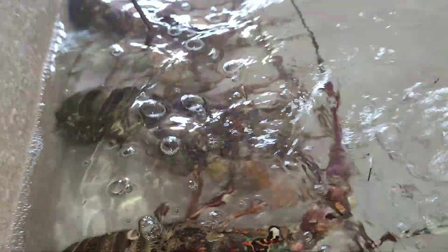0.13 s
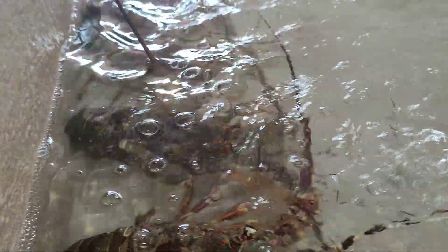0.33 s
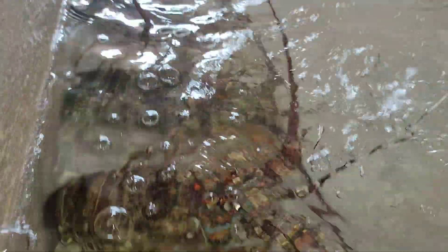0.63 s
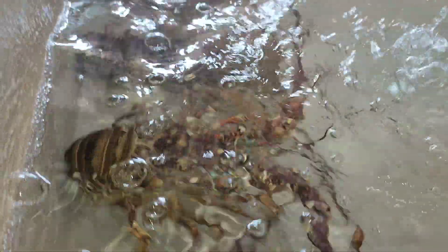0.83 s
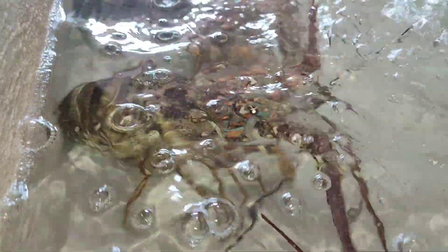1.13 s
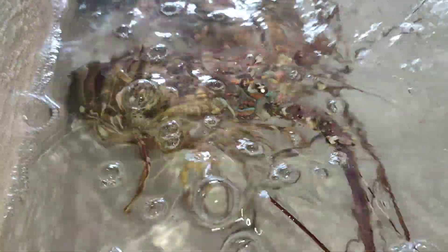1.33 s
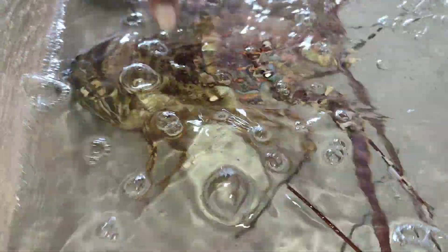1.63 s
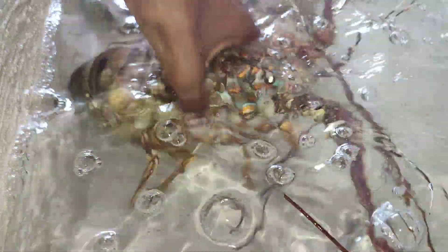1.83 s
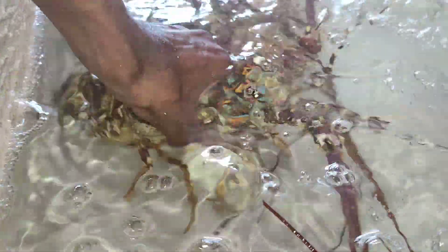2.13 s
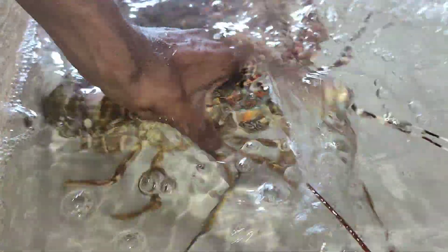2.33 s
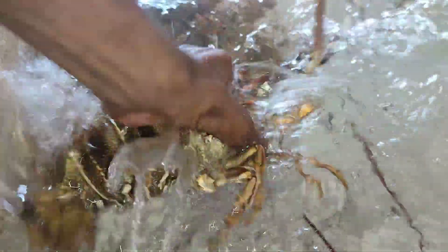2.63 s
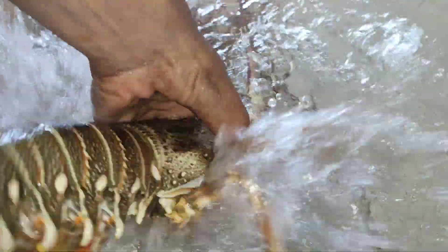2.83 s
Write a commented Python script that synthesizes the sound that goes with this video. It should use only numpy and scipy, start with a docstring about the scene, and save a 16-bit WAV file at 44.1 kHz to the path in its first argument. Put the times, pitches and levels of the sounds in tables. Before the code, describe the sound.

Water bubbles steadily in a tank from start to finish: low, rounded, overlapping glugs rising slightly in pitch, over a quiet pump hum, faint wavering whines and soft surface fizz. Small bubbles pop from about 0.3 to 2.4 s. At 2.56 s a lobster's shell snaps sharply; tail flaps throw bright splashes around 2.7, 2.84 and 2.97 s, with clicks and hollow plops. Close, slight tank reflection.

```python
"""Lobster lifted from a bubbling tank

Air glugs steadily into the water, each bubble a ringing tone whose pitch creeps up.
Behind it are a pump's hum, thin wavering tones and the fizz of the surface, made of coloured noise.
Near the end the shell clicks in short noisy rings and the tail flaps three times.
The flaps throw spray, made of random droplets and tiny bubbles, and air pockets plop."""
import sys
import numpy as np
from scipy import signal
from scipy.fft import rfft, irfft
from scipy.io import wavfile
from scipy.ndimage import uniform_filter1d

SR = 44100
rng = np.random.default_rng(int(sys.argv[2]) if len(sys.argv) > 2 else 0)


def digitize_waveform(pressure):
    """Quantize a signal to 16-bit integers and store it at the path in sys.argv[1].

    Rows of a 2-D input are taken as channels; values are limited to [-1, 1].
    """
    field = np.atleast_2d(pressure).T
    bounded = np.clip(field, -1, 1)
    quanta = np.round(bounded * 32767).astype(np.int16)
    wavfile.write(sys.argv[1], SR, quanta)


N = 132300  # samples: three seconds
T = np.arange(N) / SR  # time in seconds
HZ = np.fft.rfftfreq(N, 1 / SR)  # frequencies of a full-length spectrum
BUBBLE_GLIDE_PER_S = 1.94  # pitch rise of a bubble, as a share of its pitch per second


def amp(db):
    """Turns decibels into gain."""
    return 10 ** (np.asarray(db) / 20)


def unit(x):
    """Scales a sound to an rms of 1."""
    return x / np.sqrt(np.mean(x ** 2) + 1e-20)


def read(points, hz):
    """Reads a curve of (Hz, value) points on a log-frequency axis."""
    point_hz, value = np.transpose(points)
    return np.interp(np.log(hz + 1), np.log(point_hz + 1), value)


def level(points):
    """Gain over time from (s, dB) points."""
    return amp(np.interp(T, *np.transpose(points)))


def pan(side_db):
    """Left and right gains of mean power 1; side_db is left minus right."""
    side_db = np.atleast_1d(side_db)
    gains = amp(np.array([side_db, -side_db]) / 2)
    return gains / np.sqrt((gains ** 2).mean(0))


def add(mix, start_s, sound):
    """Mixes a sound in at a start time, cut off at the end of the mix."""
    start = max(round(start_s * SR), 0)
    part = mix[:, start:][:, :sound.shape[-1]]
    part += sound[..., :part.shape[1]]


def drift(seconds):
    """Smooth random wander of rms 1; more seconds make it slower."""
    smooth = np.exp(-(HZ * seconds) ** 2)
    return unit(irfft(rfft(rng.standard_normal(N)) * smooth, N))


def hump(hz, centre_hz, width):
    """Bell curve on a log-frequency axis."""
    return np.exp(-.5 * (np.log((hz + 1) / centre_hz) / width) ** 2)


def decay(t, t60):
    """Exponential fade that loses 60 dB in t60 seconds."""
    return np.exp(-np.log(1000) * t / t60)


def bubble(hz, t60, rise_s, glide):
    """A ringing air bubble whose pitch creeps up by glide per second; envelope peak 1."""
    t = np.arange(SR // 5) / SR
    shape = (1 - np.exp(-t / rise_s)) * decay(t, t60)
    turns = hz * (t + glide * t ** 2 / 2)
    return shape / shape.max() * np.sin(2 * np.pi * turns)


def bloop(length_s, first_hz, last_hz):
    """A bubble that swells and fades while its pitch sweeps up; envelope peak 1."""
    n = round(length_s * SR)
    turns = np.cumsum(np.geomspace(first_hz, last_hz, n)) / SR
    return np.hanning(n) * np.sin(2 * np.pi * turns)


def crowd(per_s, hz, spread, t60, side_db, uneven_db=0, count=32):
    """Random bubbles in count sizes, weaker away from the middle pitch; side_db scatters them in stereo."""
    out = np.zeros((2, N))
    strength = amp(uneven_db * rng.uniform(-1, 1, N))
    for place in np.linspace(-2, 2, count):
        starts = rng.random(N) < per_s / count / SR
        hits = starts * strength * np.exp(-place ** 2 / 4)
        ring = bubble(hz * np.exp(spread * place), t60, t60 / 20, BUBBLE_GLIDE_PER_S)
        out += pan(side_db * rng.normal()) * signal.oaconvolve(hits, ring)[:N]
    return unit(out)


def whistle(hz, waver_hz):
    """A thin tone that wavers in pitch and flutters in strength, rms 1."""
    flutter_db = 1.3
    start_turn = rng.random((2, 1)) / 4  # left and right start at slightly different phases
    turns = np.cumsum(hz + waver_hz * drift(seconds=0.0076)) / SR + start_turn
    return unit(np.sin(2 * np.pi * turns) * amp(flutter_db * drift(seconds=0.025)))


def spray_colour(hz):
    """Gain of splashing water at each frequency, with the bass rolled off."""
    # relative strength of the spray: pitch_hz, level_db (per Hz, before the bass cut)
    colour = [(240, -45), (400, -4), (725, -8), (939, -29), (1110, -10), (1220, -16), (1730, -8),
              (2530, -5), (3180, -4.5), (4320, -2.5), (4660, -6), (7030, -3), (9250, -16), (12900, -11),
              (15300, -20)]
    bass_cut_hz = 480
    return amp(read(colour, hz)) / np.sqrt(1 + (bass_cut_hz / (hz + 1)) ** 4)


def click(hz, t60, broad_db):
    """A sharp wet tick: noise ringing around one pitch plus a broad crack, fading fast."""
    width, rise_s = 0.071, 0.00052
    t = np.arange(4096) / SR
    f = np.fft.rfftfreq(len(t), 1 / SR)
    colour = hump(f, hz, width) + amp(broad_db) * spray_colour(f)
    ring = unit(irfft(rfft(rng.standard_normal((2, len(t)))) * colour))
    return 0.85 * ring * np.minimum(t / rise_s, 1) * decay(t, t60)


def pump_hum():
    """The pump's hum: steady sine waves, the same on both sides."""
    # hum tones: pitch_hz, level_db (rms)
    tones = [(50.7, -46.5), (101.3, -43.5)]
    hum = np.zeros(N)
    for hz, db in tones:
        hum += amp(db) * unit(np.sin(2 * np.pi * (hz * T + rng.random())))
    return hum


def thin_tones():
    """Faint thin whines, and two wavering whistles that swell and fade over time."""
    # whines: pitch_hz, waver_hz (rms), level_db, left_minus_right_db
    whines = [(2191, 6, -56, -5), (5354, 7, -53, -8), (5477, 7, -57, -8)]
    # strength of the lower whistle: time_s, level_db
    low_level = [(0, -54), (.38, -48), (.5, -43), (.6, -53), (.75, -46.5), (1.1, -62), (2.1, -50.5),
                 (3, -49)]
    # strength of the higher whistle: time_s, level_db
    high_level = [(0, -55), (.5, -55), (.8, -44.5), (.92, -47.5), (1.1, -38.5), (1.28, -50.5),
                  (1.48, -43.5), (1.75, -43), (2.05, -50.5), (2.6, -48.5)]
    out = np.zeros((2, N))
    for hz, waver_hz, db, side_db in whines:
        out += amp(db) * pan(side_db) * whistle(hz, waver_hz)
    out += level(low_level) * pan(1) * whistle(2266, waver_hz=6.7)
    out += level(high_level) * pan(-11) * whistle(2739, waver_hz=3.75)
    return out


def wash():
    """Churn and fizz of the surface: coloured noise in drifting patches, hollow where the glugs ring."""
    # relative strength of the churn: pitch_hz, level_db (per Hz)
    colour = [(12, -53), (20, -48), (44, -17), (74, -22.5), (101, -11), (130, -17.5), (203, -2.5),
              (240, -3), (386, -11), (1470, -29), (2240, -28), (2430, -28), (2650, -28.5), (2880, -28.5),
              (4370, -34.5), (7030, -33), (8550, -47.5), (12300, -43.5), (15800, -51)]
    # stereo balance: pitch_hz, left_minus_right_db
    balance = [(60, 1.5), (95, -1), (150, -1), (240, -1.5), (380, 4.5), (600, 1.5), (950, -1.0), (1500, -4),
               (2380, -6), (3770, -7), (5980, -13), (9470, -3.5), (15000, -10.5)]
    # left-right likeness: pitch_hz, likeness (1 the same, 0 unrelated, below 0 opposed)
    likeness = [(25, .8), (60, .88), (130, .97), (240, .94), (480, .66), (950, .1), (1900, -.12), (3800, 0)]
    wash_db, patchy_db = -37.5, 1.0  # wash_db sets the 1-8 kHz part of the left-right average
    hollow_db, hollow_hz, hollow_width = -1, 233, 0.11
    hz = np.fft.rfftfreq(2048, 1 / SR)
    a, b, c, d, patches = rng.standard_normal((5, N // 512 + 5, len(hz)))

    # smooth the patches over time, then over frequency
    patches = uniform_filter1d(patches, size=4, axis=0)
    patches = unit(uniform_filter1d(patches, size=24, axis=1))

    # the right side shares part of the left side's noise
    same = np.clip(read(likeness, hz), -1, 1)
    left, other = a + 1j * b, c + 1j * d
    right = same * left + np.sqrt(1 - same ** 2) * other
    spectrum = np.array([left, right]) * pan(read(balance, hz))[:, None]

    hollow = hollow_db * hump(hz, hollow_hz, hollow_width)
    gain = amp(read(colour, hz) + hollow + patchy_db * patches)
    spectrum *= gain / np.sqrt(1 + same)  # offsets the boost where both sides agree
    out = signal.istft(spectrum.transpose(0, 2, 1), nperseg=2048, noverlap=1536)[1][:, :N]
    fizz = irfft(rfft(out.mean(0)) * ((HZ > 1000) & (HZ < 8000)), N)
    return amp(wash_db) * out / fizz.std()


def aerator():
    """Air entering the water: big ringing glugs, crowds of small bubbles and a few rising bloops."""
    # large bubbles leaving the hose: start_s, level_db (before glug_db), pitch_hz
    glugs = [(0.055, -15.5, 248), (0.17, -12, 236), (0.295, -9, 208), (0.382, -8, 227), (0.473, -12.5, 279),
             (0.505, -10, 241.5), (0.659, -10, 247), (0.732, -11.5, 223), (0.802, -12.5, 250.7),
             (0.918, -7.5, 250.4), (0.963, -12, 214), (1.059, -11, 178), (1.161, -10.5, 206.5),
             (1.2, -4, 220.4), (1.228, -8.5, 241), (1.339, -8, 224), (1.366, -8, 211), (1.437, -13, 229),
             (1.469, -8.5, 216.5), (1.54, -9.5, 241), (1.6, -15, 296), (1.68, -17, 285),
             (1.732, -11, 233.3), (1.817, -8, 246.6), (1.931, -17, 240), (1.995, -15, 250),
             (2.08, -6.5, 229.4), (2.131, -14, 224), (2.151, -10, 205), (2.224, -11.5, 222),
             (2.272, -13.5, 204), (2.341, -8.5, 203), (2.365, -14.5, 260), (2.508, -22, 255),
             (2.599, -10, 246.5), (2.637, -14.5, 228), (2.664, -13, 240), (2.708, -13, 221),
             (2.742, -11.5, 267), (2.803, -13, 221), (2.925, -14, 226)]
    # gain of both crowds of small bubbles: time_s, level_db
    crowd_level = [(0, -6.5), (1.0, -3), (1.3, 1.5), (1.6, 0), (1.9, 3), (2.3, 2), (2.7, -0.5), (3, 2.5)]
    # bubbles rising in pitch as they reach the surface: start_s, length_s, level_db, first_hz, last_hz
    bloops = [(0.053, 0.029, -21.5, 392, 600), (0.196, 0.032, -24.5, 349, 477),
              (.838, 0.035, -39, 388, 513), (1.3, 0.036, -20.5, 304, 378), (1.547, 0.04, -18, 360, 470),
              (1.572, 0.041, -25, 423, 595), (1.841, 0.079, -23.5, 321, 435), (1.903, 0.06, -30, 383, 476),
              (2.025, 0.056, -25, 432, 717)]
    glug_db, glug_rise_s, glug_t60 = -7.5, 0.0018, 0.18
    low_crowd = crowd(per_s=300, hz=242.5, spread=.15, t60=0.071, side_db=-3.5)
    burble = crowd(per_s=600, hz=407, spread=0.297, t60=0.033, side_db=15)
    out = amp(-29.5) * low_crowd + amp(-37) * burble
    out *= level(crowd_level)
    for start_s, db, hz in glugs:
        add(out, start_s, amp(db + glug_db) * bubble(hz, glug_t60, glug_rise_s, BUBBLE_GLIDE_PER_S))
    for start_s, length_s, db, first_hz, last_hz in bloops:
        add(out, start_s, amp(db) * bloop(length_s, first_hz, last_hz))
    return out * pan(0.69)


def pops():
    """Bubbles burst at the surface with a tick and a short upward chirp."""
    # bursts: start_s, level_db, pitch_hz, tick_over_chirp_db
    bursts = [(.329, -30, 7070, 6), (0.601, -30.5, 3170, -10), (1.137, -38, 2750, 16),
              (1.349, -29, 2600, -12), (1.359, -26.5, 2950, -9), (1.61, -32, 2510, -10),
              (1.737, -32, 2280, -6), (1.833, -26, 2980, 4.5), (2.341, -24.5, 2720, -6),
              (2.404, -40, 5960, 15)]
    glide_per_s, t60, side_db = 6.8, 0.017, -8
    out = np.zeros((2, N))
    for start_s, db, hz, tick_db in bursts:
        chirp = bubble(hz, t60, 0.00025, glide_per_s)
        add(out, start_s, amp(db) * pan(side_db) * chirp)
        add(out, start_s, amp(db + tick_db) * pan(side_db) * click(hz, t60, broad_db=25))
    return out


def slosh():
    """Small bubbles ring in the water stirred by the tail."""
    # strength of the stirring: time_s, level_db
    slosh_level = [(2.62, -70), (2.67, -35), (2.72, -30.5), (2.77, -36.5), (2.85, -25), (2.89, -38),
                   (2.93, -44), (2.96, -32)]
    bubbles = crowd(per_s=1100, hz=1052, spread=.45, t60=.018, side_db=49, uneven_db=7, count=48)
    return level(slosh_level) * bubbles


def spray():
    """Each tail flap throws bursts of droplets, mist and tiny ringing bubbles."""
    # bursts of spray: peak_s, level_db, rise_db_per_s, fall_db_per_s, left_minus_right_db
    flaps = [(2.675, -25, 1500, 600, 0), (2.716, -21, 600, 260, 2), (2.812, -28.5, 900, 300, -4),
             (2.841, -15, 430, 500, 1.5), (2.86, -18.5, 598, 480, 1), (2.937, -28, 1805, 205, -4),
             (2.973, -16, 343, 80, -3.5)]
    # stereo balance of the patter: pitch_hz, left_minus_right_db
    balance = [(60, 2.0), (120, 1.0), (240, 3), (480, 11), (950, 0), (1890, 5), (3770, 0), (7520, -6),
               (15000, 0)]
    splats_per_s, drop_spread_db, drop_side_db = 1900, 3, 6
    mist_share, tinkle_db, clump_db = .4, -8.5, 1.5

    # single-sample drops of random size, side and sign, over steady noise for mist
    hits = rng.random(N) < splats_per_s / SR
    sizes = amp(drop_spread_db * np.minimum(rng.exponential(1, N), 2)) * rng.choice([-1, 1], N)
    sides = pan(drop_side_db * rng.standard_normal(N)) * rng.choice([-1, 1], (2, N))
    drops = unit(hits * sizes * sides) + mist_share * rng.standard_normal((2, N))
    patter = unit(irfft(rfft(drops) * pan(read(balance, HZ)) * spray_colour(HZ), N))

    tinkle = crowd(per_s=1100, hz=2900, spread=0.454, t60=0.0094, side_db=33, uneven_db=10, count=48)
    clumps = amp(clump_db * drift(seconds=0.0098))
    water = unit(patter * clumps + amp(tinkle_db) * tinkle)

    power = np.zeros((2, N))
    for peak_s, db, rise, fall, side_db in flaps:
        drop_db = np.maximum(rise * (peak_s - T), fall * (T - peak_s))
        power += (pan(side_db) * amp(db - drop_db)) ** 2
    return water * np.sqrt(power)


def air_pockets():
    """Air pockets plop shut behind the tail and water gulps back, as bubbles rising in pitch."""
    # closing air pockets: start_s, level_db (peak), pitch_hz
    plops = [(2.689, -21.5, 850), (2.709, -13.5, 754), (2.712, -16, 1100), (2.724, -19, 734),
             (2.736, -18, 700), (2.736, -17, 450), (2.738, -15, 1700), (2.7917, -8.5, 2500),
             (2.822, -21, 1050), (2.8395, -10, 677), (2.84, -14.5, 1086), (2.856, -20, 2000),
             (2.861, -16, 750)]
    # water gulping back behind the last flap: start_s, length_s, level_db (peak), first_hz, last_hz
    gulps = [(2.95, .022, -24.5, 462, 603), (2.972, 0.013, -17, 620, 780), (2.988, 0.0097, -10, 656, 850)]
    t60, rise_s, glide_per_s = 0.02, 0.00074, 5.5
    right_lag_s = 0.00027  # the right side hears the pockets later
    pockets = np.zeros((1, N))
    for start_s, db, hz in plops:
        add(pockets, start_s, amp(db) * bubble(hz, t60, rise_s, glide_per_s))
    for start_s, length_s, db, first_hz, last_hz in gulps:
        add(pockets, start_s, amp(db) * bloop(length_s, first_hz, last_hz))
    left = pockets[0]
    return np.array([left, np.interp(T - right_lag_s, T, left)])


def shell():
    """The shell snaps as a few ringing modes; clicks and water slaps are short noisy rings."""
    # ringing modes of the first hard snap: pitch_hz, level_db, t60_s, left_minus_right_db
    snap_modes = [(3770, -20, 0.0093, -2), (4740, -27, .007, -5), (6530, -14, 0.013, -8),
                  (7300, -8.5, 0.0083, -14), (8180, -19.5, 0.012, 7)]
    # clicks and slaps: start_s, level_db, pitch_hz, broad_crack_db, left_minus_right_db, t60_s
    clicks = [(2.5619, -10.5, 2000, 12, 0.5, .016), (2.5713, -21, 5250, -18, 10, 0.019),
              (2.589, -18, 2280, -14, 7, 0.014), (2.612, -17, 2300, -23, 14, 0.011),
              (2.6882, -10.5, 1620, -3.5, -5, 0.025), (2.737, -10.5, 2030, -14, 0, 0.014),
              (2.780, -15.5, 3480, 0, -10, 0.015), (2.7917, -9, 7100, -4, 0, 0.011),
              (2.794, -6, 3200, -2, -6, 0.013), (2.8409, -9, 2900, 9, -1, 0.027),
              (2.8638, -10, 2190, 6, -4, .013), (2.93, -19.5, 4500, 21, 7, 0.061),
              (2.9922, -5.5, 3230, 3, 7, 0.02)]
    snap_s, snap_rise_s = 2.5626, .0001
    out = np.zeros((2, N))
    for hz, db, t60, side_db in snap_modes:
        add(out, snap_s, amp(db) * pan(side_db) * bubble(hz, t60, snap_rise_s, 0))
    for start_s, db, hz, broad_db, side_db, t60 in clicks:
        add(out, start_s, amp(db) * pan(side_db) * click(hz, t60, broad_db))
    return out


def lobster():
    """The flapping tail stirs and throws water, the shell clicks and air pockets plop."""
    return slosh() + spray() + air_pockets() + shell()


def room(x):
    """Adds a short diffuse tail from the tank walls and the room, as fading noise."""
    t60, rise_s, tail_db = 0.053, 0.0026, -12.5
    t = np.arange(SR // 2) / SR
    tail = rng.standard_normal((2, len(t))) * np.minimum(t / rise_s, 1) * decay(t, t60)
    tail = tail / np.linalg.norm(tail[0])
    return x + amp(tail_db) * signal.fftconvolve(x, tail, axes=1)[:, :N]


def scene():
    """The running tank, with its gain lowered briefly at set times near the end, and the lobster."""
    # brief gain drops on the tank sound: start_s, end_s, change_db
    gain_drops = [(2.838, 2.932, -5), (2.985, 3.05, -3)]
    gain_db = np.zeros(N)
    for start_s, end_s, db in gain_drops:
        gain_db += db * ((T > start_s) & (T < end_s))
    gain_db = uniform_filter1d(gain_db, size=300)  # softens the edges
    tank = pump_hum() + thin_tones() + wash() + aerator()
    return tank * amp(gain_db) + room(pops() + lobster())


def record(dry):
    """Soft overload rounds the loudest peaks, then a steep filter removes the highest treble."""
    ceiling, edge_hz = .85, 15750
    held = dry / (1 + (dry / ceiling) ** 6) ** (1 / 6)
    low_pass = signal.firwin(401, edge_hz, window=("kaiser", 8), fs=SR)
    return signal.oaconvolve(held, low_pass[None], "same", axes=1)


dry = scene()
out = record(dry)
digitize_waveform(out)
```